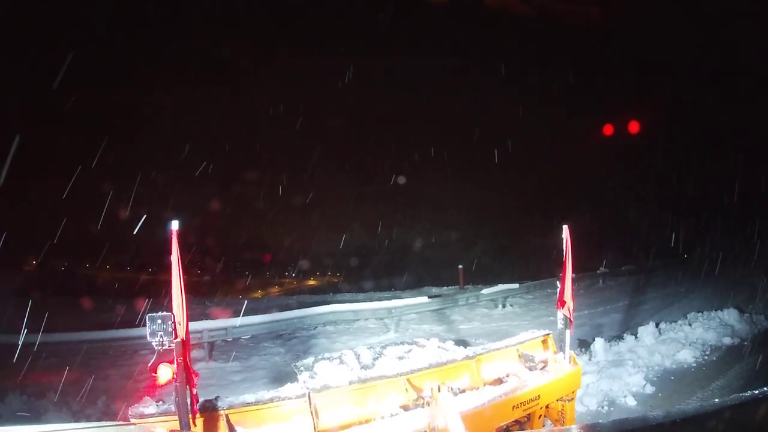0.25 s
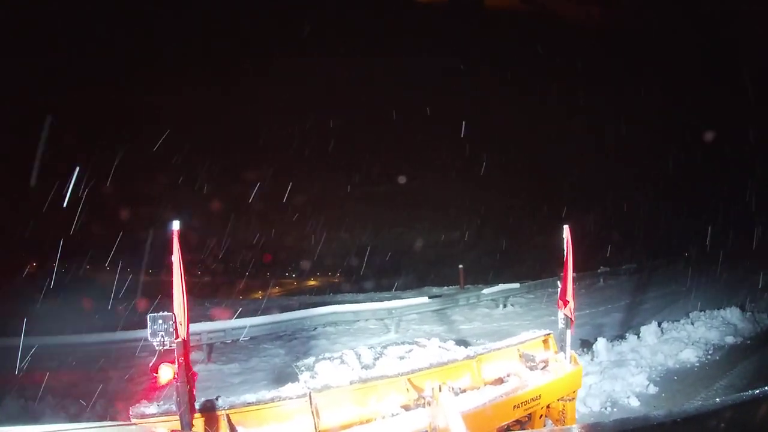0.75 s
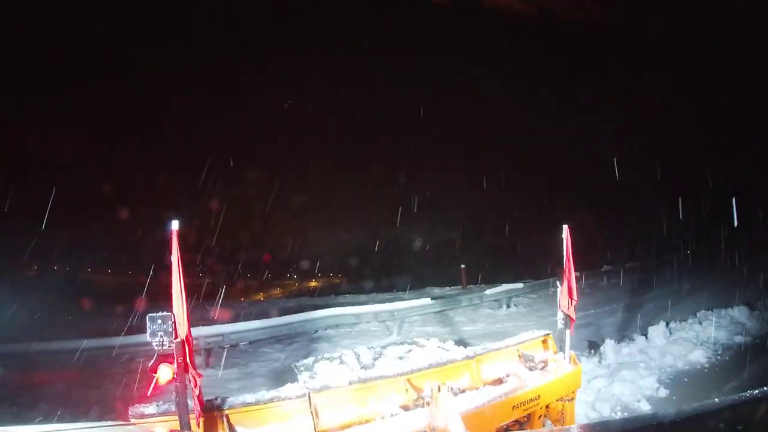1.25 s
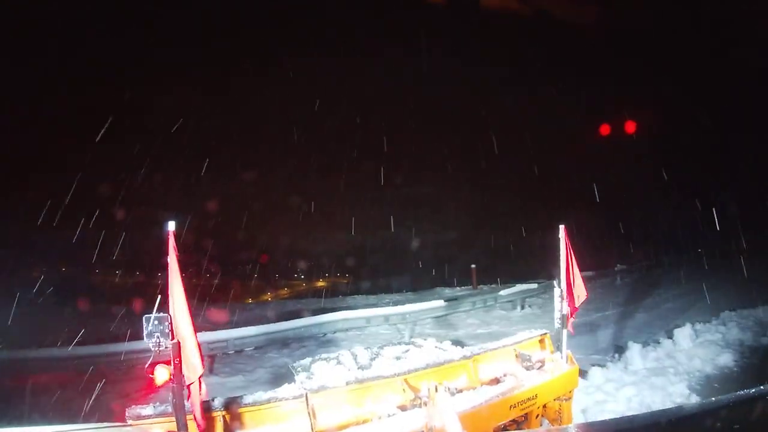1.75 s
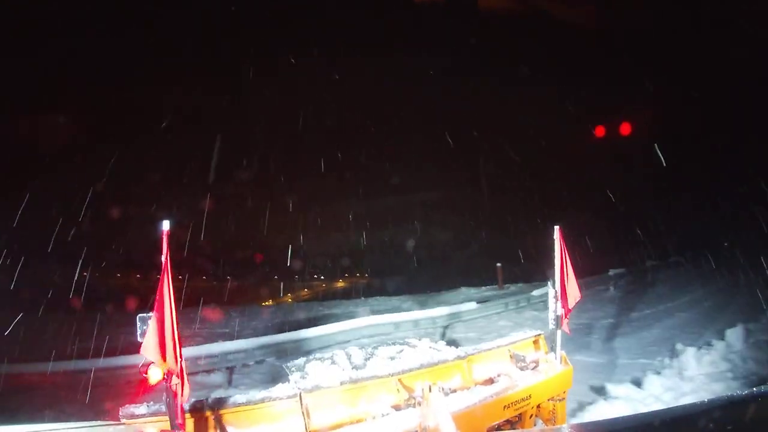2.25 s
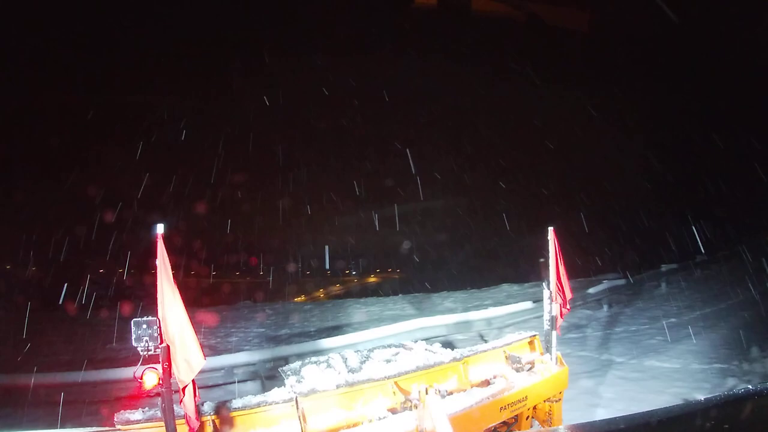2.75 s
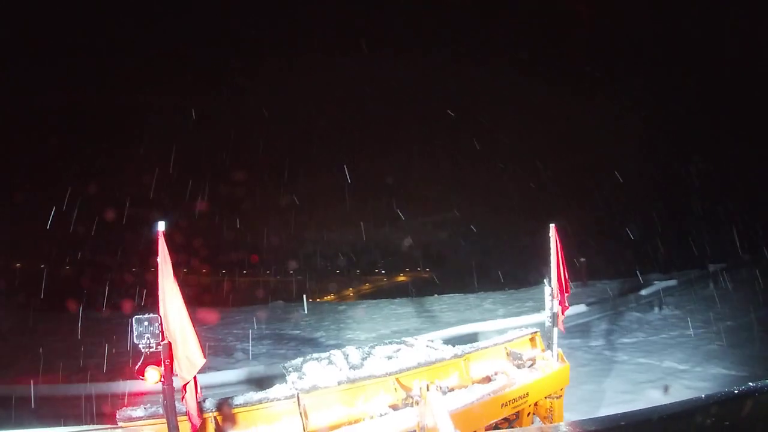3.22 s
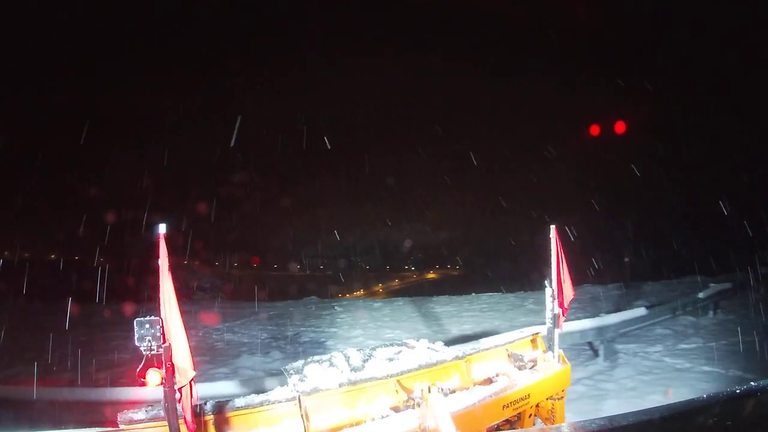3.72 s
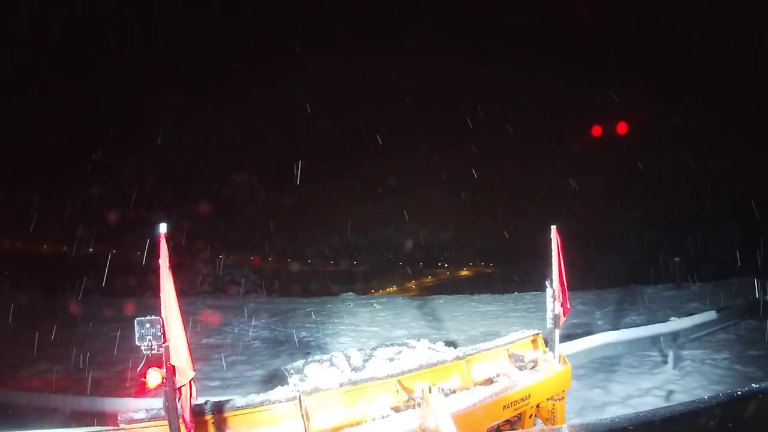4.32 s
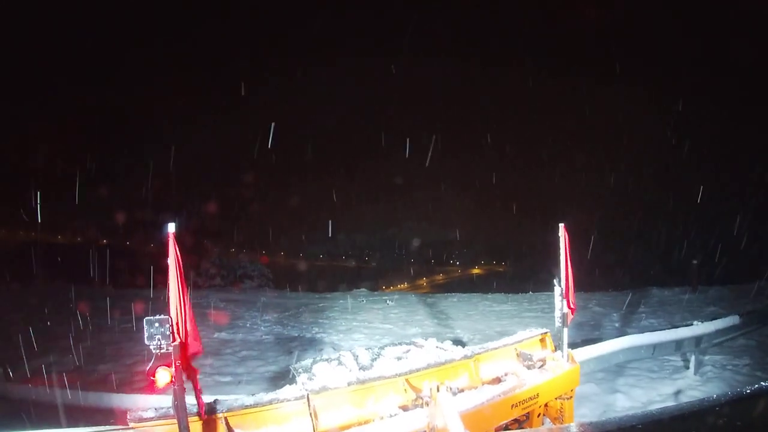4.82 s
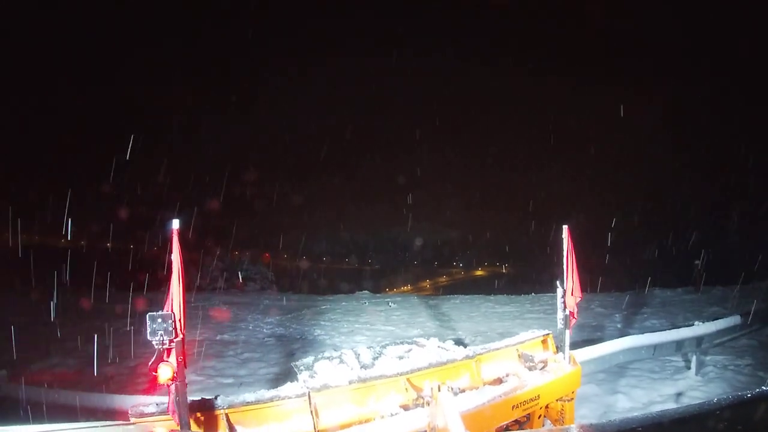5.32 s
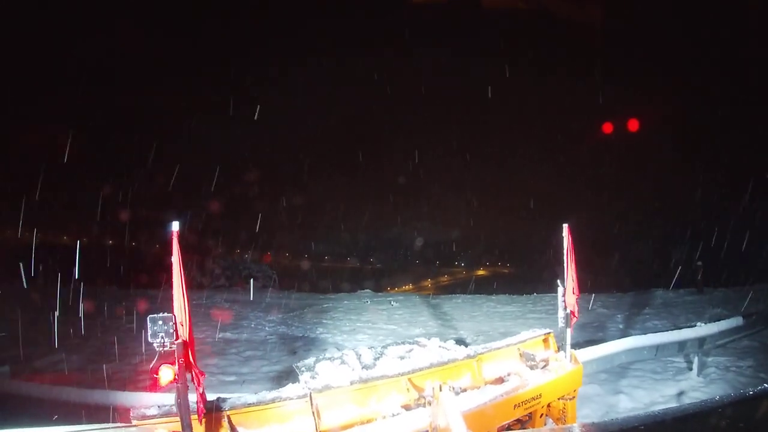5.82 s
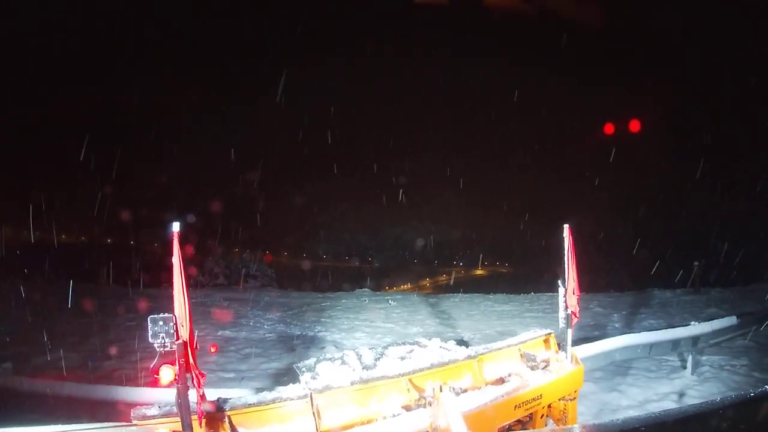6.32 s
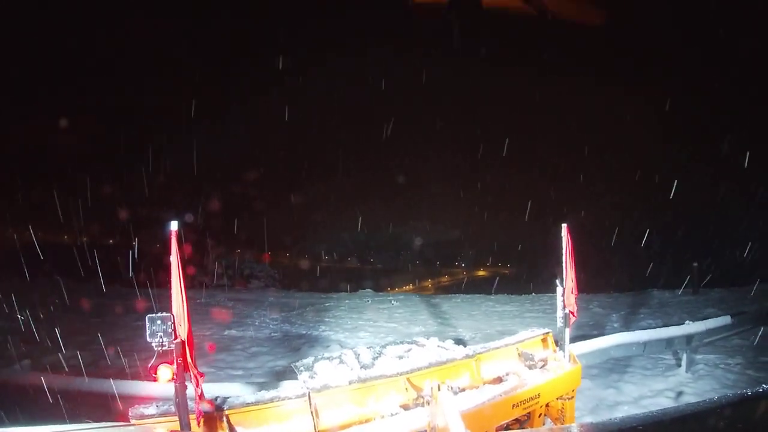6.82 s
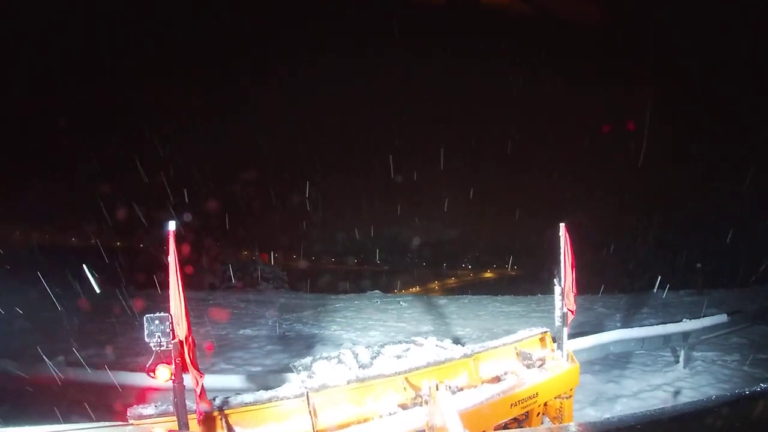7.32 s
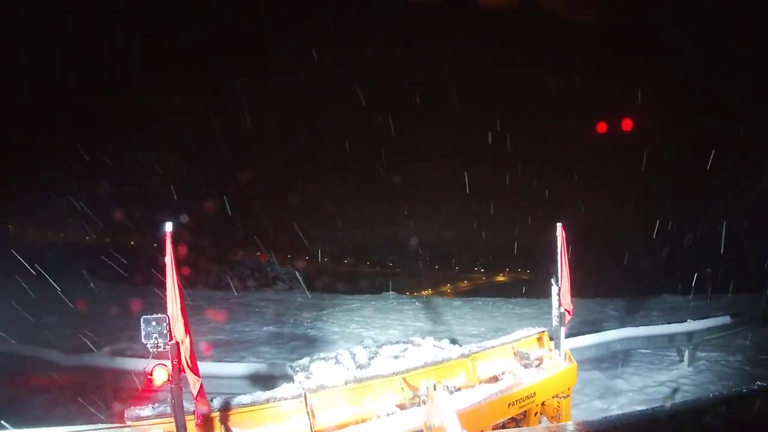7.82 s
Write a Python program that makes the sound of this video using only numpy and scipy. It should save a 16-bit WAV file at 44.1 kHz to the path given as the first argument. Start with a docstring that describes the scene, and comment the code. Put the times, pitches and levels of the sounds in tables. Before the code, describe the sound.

Inside the closed cab of a snow plow truck, a deep diesel boom dominates, wavering and dipping briefly over low tyre rumble, a steady muffled blade scrape and very faint spray hiss. Around 0.4 s the blade drags harder, and from 0.6 to 0.8 s it bangs in a rapid, uneven cluster of metallic knocks with heavy chassis thumps. The edge chatters until about 1.2 s while revs climb quickly, then sink towards 1.9 s. A short squeak sounds at 1.3 s. A dull knock and thump land at 2.1 s as the engine surges again until 2.5 s, then drops. Another muffled knock comes at 3.3 s. Revs ease, jump up near 4.5 s, then slowly decline until about 7 s, rising again at the end. The clearest chirp is at 5.6 s, with smaller squeaks at 6.2 and 7.2 s and light trim ticks and rattles from 7.2 to 7.8 s.

```python
"""The engine of a diesel truck booms at low revs, heard from inside the cab, over tyre rumble.
A snow plow's blade scrapes, spray hisses, and the edge chatters over hard ground.
The plow bangs and the chassis thumps; short high squeaks and ticks of loose trim follow.
Engine and squeaks are phase-driven tones; road, chatter and ticks are coloured noise;
knocks mix a noise clash with ringing modes, and thumps are damped sines."""
import sys
import numpy as np
from scipy import signal
from scipy.fft import rfft, irfft, next_fast_len
from scipy.io import wavfile
from scipy.ndimage import uniform_filter1d, minimum_filter1d

SR = 44100
rng = np.random.default_rng(int(sys.argv[2]) if len(sys.argv) > 2 else 0)


def to_wav(s):
    """Save 16-bit WAV."""
    ch = np.atleast_2d(s).T  # columns
    pcm = np.round(np.clip(ch, -1, 1) * 32767)  # PCM
    wavfile.write(sys.argv[1], SR, pcm.astype(np.int16))


N = 355887
BAND_LIMIT_HZ = 15900


def amp(db):
    """Decibels to linear amplitude."""
    return 10 ** (np.asarray(db) / 20)


def unit(x):
    """Scales a signal to rms 1."""
    return x / np.sqrt(np.mean(x ** 2) + 1e-20)


def curves(rows):
    """Interpolates each column after the time column, sample by sample."""
    time_s, *columns = np.transpose(rows)
    return [np.interp(np.arange(N) / SR, time_s, column) for column in columns]


def resonance(hz, centre_hz, width_hz):
    """Bump of height 1 at the centre, 1/2 at the edges of its width."""
    return 1 / (1 + (2 * (hz - centre_hz) / width_hz) ** 2)


def colour(x, spectrum, peaks=()):
    """Filters by a smooth spectrum plus resonant bumps; rms 1."""
    hz = np.fft.rfftfreq(len(x), 1 / SR)
    point_hz, point_db = np.transpose(spectrum)
    gain_db = np.interp(np.log(hz + 1), np.log(point_hz), point_db)
    for centre_hz, width_hz, boost_db in peaks:
        gain_db = gain_db + boost_db * resonance(hz, centre_hz, width_hz)
    return unit(irfft(rfft(x) * amp(gain_db), len(x)))


def wander(hz, size=N):
    """Smooth random drift: noise with a Gaussian low-pass at hz, rms 1 over the scene."""
    length = next_fast_len(N)
    f = np.fft.rfftfreq(length, 1 / SR)
    spectrum = rfft(rng.standard_normal(length)) * np.exp(-(f / hz) ** 2)
    return unit(irfft(spectrum))[:size]


def arch(start_s, length_s):
    """Rises from 0 to 1 and back over the given stretch."""
    progress = np.clip((np.arange(N) / SR - start_s) / length_s, 0, 1)
    return np.sqrt(abs(np.sin(np.pi * progress)))


def add(mix, start_s, sound):
    """Adds a sound into the mix in place, cut at the end."""
    part = mix[max(round(start_s * SR), 0):][:len(sound)]
    part += sound[:len(part)]


# engine speed, rising with the throttle and sagging after it: time_s, firing_rate_hz
REVS = [(0.0, 38.6), (0.4, 37.6), (0.84, 31.75), (0.97, 41.5), (1.08, 48.5), (1.19, 50.35), (1.78, 30.43),
        (1.95, 27.44), (2.04, 29.18), (2.29, 44.07), (2.51, 47.97), (2.68, 33.46), (2.83, 33.15),
        (3.14, 36.64), (3.8, 32.62), (4.25, 30.53), (4.56, 44.65), (4.99, 44.6), (5.3, 41.3), (7.1, 33.66),
        (7.6, 33.69), (8.07, 42.97)]


def firing_angle():
    """Phase of the engine: one turn for each firing."""
    return 2 * np.pi * np.cumsum(curves(REVS)[0]) / SR


# boom at the firing rate: time_s, level_db
BOOM = [(0, -14.5), (.8, -13), (.95, -12.5), (1.2, -11.5), (1.5, -16), (1.92, -12), (2.45, -12.5),
        (2.8, -15.5), (3.6, -13), (4.5, -14), (5, -18), (5.6, -13.5), (6.4, -15.5), (7, -14), (8.07, -12.5)]
# brief dips of the boom: middle_s, half_length_s, depth_db
BOOM_DIPS = [(0.624, 0.11, 6.5), (1.281, 0.076, 7), (1.77, 0.068, 10), (2.128, 0.02, 8), (2.646, 0.1, 10),
             (3.35, 0.083, 8), (3.865, 0.19, 2.5), (4.699, 0.024, 10), (4.785, .025, 5), (4.97, 0.036, 6),
             (5.135, 0.028, 7), (5.23, 0.026, 11), (6.57, 0.04, 3.5), (6.739, .035, 3)]
# main overtones before cab lift: time_s, order_2_db, order_3_db, order_4_db, order_10_3_db
OVERTONES = [(0, -30, -36, -51, -41.5), (.35, -27.5, -39, -45.5, -41), (.7, -33, -47, -37, -45),
             (1.05, -36.5, -40, -50, -47), (1.6, -34, -46, -45.5, -41), (1.9, -29.5, -44.5, -46, -47.5),
             (2.55, -36.5, -47, -53, -54), (2.9, -32.5, -45, -42.5, -43.5), (4.1, -33.5, -35.5, -34.5, -43),
             (4.45, -35.5, -39.5, -45.5, -45.5), (4.8, -29, -38.5, -46.5, -52),
             (5.2, -32, -43.5, -48, -38.5), (5.7, -31, -43, -52, -41), (6.05, -35.5, -44, -47.5, -36.5),
             (6.65, -28, -46, -34, -42.5), (7.1, -37, -45, -40.5, -45), (7.4, -44, -46, -34.5, -46),
             (7.8, -32, -40.5, -46.5, -40.5), (8.07, -38, -42.5, -48, -44)]
# weaker engine orders before cab lift: multiple_of_firing_rate, level_db
WEAK_ORDERS = [(4 / 3, -43.5), (8 / 3, -42), (5, -46), (6.5, -51), (9, -53.5), (16 / 3, -49.5)]
# cab air resonances: centre_hz, width_hz, boost_db
CAB_AIR = [(63, 13, 10.5), (128.9, 23.2, 8), (170.4, 11, 7.5)]
BOOM_WAVER_DB, WAVER_DB_PER_DIP_DB = 1.25, 0.37


def engine(angle):
    """Firing-rate boom in the closed cab; overtones swell in its resonances, roughened by uneven combustion."""
    rate_hz, t = curves(REVS)[0], np.arange(N) / SR
    dip_db = sum(depth_db * np.exp(-((t - middle_s) / half_s) ** 4)
                 for middle_s, half_s, depth_db in BOOM_DIPS)
    waver_db = (BOOM_WAVER_DB + WAVER_DB_PER_DIP_DB * dip_db) * wander(hz=22.2)
    out = amp(curves(BOOM)[0] - dip_db + waver_db) * np.cos(angle)
    muffle_db = -.3 * np.maximum(rate_hz - 44, 0)  # high revs soften the overtones
    main_orders = list(zip([2, 3, 4, 10 / 3], curves(OVERTONES)))
    for multiple, level_db in main_orders + list(WEAK_ORDERS):
        lift_db = sum(boost_db * resonance(multiple * rate_hz, centre_hz, width_hz)
                      for centre_hz, width_hz, boost_db in CAB_AIR)
        if multiple % 1:
            offset_rad = 2 * np.pi * rng.random()
        else:
            offset_rad = np.pi / 2 * (multiple - 1)  # whole orders lock into one steep stroke
        phase = multiple * angle + offset_rad + 0.27 * wander(hz=16.0)
        order_db = level_db + lift_db + muffle_db + 1.5 * wander(hz=7.1)
        out += amp(order_db) * np.cos(phase)
    return np.sqrt(2) * out  # peak to rms levels


# driving levels: time_s, rumble_db, scrape_db, hiss_db
DRIVE = [(0, -28, -37.5, -54), (.36, -28.5, -38, -60), (.72, -24, -38.5, -62.5), (.95, -26.5, -38, -54.5),
         (1.15, -25.5, -38.5, -57), (1.21, -31.5, -43, -65.5), (1.95, -27, -39.5, -56.5),
         (2.42, -30.5, -40.5, -62.5), (2.54, -31.5, -43, -61.5), (3.4, -27, -38, -62),
         (4.8, -27.5, -38.5, -59.5), (5.6, -26.5, -36, -56), (6.1, -28, -37.5, -59.5),
         (7.45, -26, -37.5, -58.5), (8.07, -31.5, -40, -61.5)]
# blade drags over hard patches: start_s, length_s, scrape_boost_db, hiss_boost_db
DRAGS = [(0.426, 0.16, 2.5, 11), (3.47, 0.066, 1.5, 6)]
# tyre and chassis rumble spectrum: freq_hz, relative_density_db
RUMBLE_COLOUR = [(12, -8), (26, 5), (55, -3), (90, 2.5), (128, 0.5), (155, -3), (185, -3), (222, -7.5),
                 (295, -5), (380, -12), (480, -16.5), (700, -22), (1500, -75.5)]
# cab boom excited by the tyres: centre_hz, width_hz, boost_db
RUMBLE_PEAKS = [(127.5, 11, 4.5), (245, 10, 1.5), (287, 16, 2)]
# blade scrape spectrum: freq_hz, relative_density_db
SCRAPE_COLOUR = [(150, -25.5), (400, -2), (570, 5), (700, -3.5), (900, -1), (1100, -4.5), (1500, -6),
                 (1900, -8), (2300, -13), (3150, -13), (3800, -19.5), (5000, -28), (6500, -42), (9000, -72)]
# cab panel resonances excited by the scrape: centre_hz, width_hz, boost_db
PANELS = [(555, 92, 4), (786, 45, 4), (1231, 42, 7.5), (3100, 350, 1.5)]
# snow spray spectrum: freq_hz, relative_density_db
HISS_COLOUR = [(1500, -34.5), (3500, 2), (4700, 1), (5200, 1.5), (5650, 3), (6100, -5), (6600, -13.5),
               (7800, -16), (8700, -22.5), (10500, -21), (11500, -52.5), (16000, -77.5)]
CLATTER_DEPTH = 0.067


def road(angle):
    """Tyres shake the chassis, the blade grinds over packed snow, and spray hisses on the cab."""
    rumble_db, scrape_db, hiss_db = curves(DRIVE)
    for start_s, length_s, scrape_boost_db, hiss_boost_db in DRAGS:
        drag = arch(start_s, length_s)
        scrape_db = scrape_db + scrape_boost_db * drag
        hiss_db = hiss_db + hiss_boost_db * drag
    tyres, blade, spray = rng.standard_normal((3, N))
    clatter = 1 + CLATTER_DEPTH * np.cos(angle)  # diesel clatter swells at every firing
    rumble = colour(tyres, RUMBLE_COLOUR, RUMBLE_PEAKS) * amp(rumble_db + 1.1 * wander(hz=16.0))
    scrape = colour(blade * clatter, SCRAPE_COLOUR, PANELS) * amp(scrape_db + .5 * wander(hz=27))
    hiss = colour(spray * clatter, HISS_COLOUR) * amp(hiss_db + 0.73 * wander(hz=20))
    return rumble + scrape + hiss


def cab(x):
    """Glass and trim return a dense, very short echo."""
    t = np.arange(4096) / SR
    echo = rng.standard_normal(len(t)) * amp(-60 * t / 0.07) * (t > .002)
    echo /= np.linalg.norm(echo)
    return x + amp(-9.0) * signal.oaconvolve(x, echo)[:N]


# edge chatter over hard ground, before cab echo: start_s, length_s, level_db
CHATTERS = [(0.492, .08, -48), (.8, 0.42, -47)]
# slip grain spectrum: freq_hz, relative_density_db
EDGE_COLOUR = [(300, -21), (900, 5), (1800, -6), (3000, -20), (6000, -30), (10000, -59)]
# ring of the steel edge: centre_hz, width_hz, boost_db
EDGE_RINGS = [(1220, 81, 11), (2350, 140, 16)]
MEAN_SLIPS_PER_S = 570


def chatter():
    """The steel edge catches and slips on hard ground: uneven grains that ring the blade."""
    grip = sum(amp(level_db) * arch(start_s, length_s) for start_s, length_s, level_db in CHATTERS)
    slips = (rng.random(N) < MEAN_SLIPS_PER_S / SR) * rng.standard_normal(N)
    return cab(colour(slips, EDGE_COLOUR, EDGE_RINGS) * grip)


# plow knocks: start_s, level_db, clash_t60_s, treble_db
KNOCKS = [(.597, -17, 0.13, 1), (0.610, -21.5, 0.12, 1.5), (0.628, -26.5, .08, -5),
          (.642, -18.5, 0.079, -0.5), (0.653, -25.5, 0.12, 4), (.683, -27, .1, -6), (0.717, -27, .08, -9),
          (0.749, -29, .08, -6), (0.786, -36, 0.14, 2), (.818, -36, .1, 3.5), (2.112, -19, 0.22, -20.5),
          (3.29, -23, 0.22, -24)]
# linkage clash spectrum: freq_hz, relative_density_db
KNOCK_COLOUR = [(50, -15), (120, 7), (200, -3.5), (330, -2), (480, -3.5), (680, -5.5), (1000, -14.5),
                (2000, -24.5), (3500, -27), (4600, -30), (5700, -29.5), (6800, -40.5), (10000, -54),
                (15000, -74)]
# plow frame modes: pitch_hz, relative_level_db, t60_s
FRAME = [(126, 0.5, 0.23), (178, 3.5, 0.16), (268, -1, .15), (373, 4.5, 0.14), (438, 3.5, 0.11),
         (565, 8.5, 0.08), (672, 2, 0.059)]
RING_PEAK_DB, CLASH_DB = 8, -1.5  # relative to each knock
RING_SPREAD_DB, RING_DETUNE_RATIO = 2.5, 0.029  # standard deviations from blow to blow


def knocks():
    """The blade trips and drops back: a linkage clash and a short frame ring, different at every blow."""
    out, t = np.zeros(N), np.arange(SR // 2) / SR
    low_pass = signal.butter(2, 260, fs=SR, output="sos")
    for start_s, level_db, clash_t60_s, treble_db in KNOCKS:
        clash = colour(rng.standard_normal(len(t)), KNOCK_COLOUR) * amp(-60 * t / clash_t60_s)
        ring = np.zeros(len(t))
        for pitch_hz, mode_db, t60_s in FRAME:
            blow_db = mode_db + RING_SPREAD_DB * rng.standard_normal()
            blow_hz = pitch_hz * (1 + RING_DETUNE_RATIO * rng.standard_normal())
            ring += amp(blow_db - 60 * t / t60_s) * np.sin(2 * np.pi * blow_hz * t)
        blow = amp(CLASH_DB) * clash + amp(RING_PEAK_DB) * ring / abs(ring).max()
        thud = signal.sosfilt(low_pass, blow)
        onset = 1 - np.exp(-t / 0.00059)
        add(out, start_s, amp(level_db) * onset * (thud + amp(treble_db) * (blow - thud)))
    return out


# chassis thumps as the blade lands: start_s, pitch_hz, level_db
THUMPS = [(.604, 125, -11), (0.679, 107, -18), (0.715, 116, -10), (0.747, 125, -20), (2.125, 85, -18)]
THUMP_RISE_S = 0.004


def thumps():
    """A few heavy swings of the chassis, quickly damped."""
    out, t = np.zeros(N), np.arange(SR // 5) / SR
    swing = t / THUMP_RISE_S * np.exp(1 - t / THUMP_RISE_S)
    for start_s, pitch_hz, level_db in THUMPS:
        add(out, start_s, amp(level_db) * swing * np.sin(2 * np.pi * pitch_hz * t))
    return out


# squeaks before cab echo:
# start_s, length_s, start_hz, middle_hz, end_hz, level_db, octave_db (relative), flutter (0-1)
SQUEAKS = [(0.936, 0.094, 10300, 10500, 10450, -59, -40, 0.3), (1.04, .04, 2480, 2350, 2250, -50, -36, 0.6),
           (1.091, 0.09, 2430, 2389, 2350, -53, -33, 0.63),
           (1.327, 0.092, 5054, 5006, 4950, -38.5, -34, .04), (1.402, .02, 4990, 4990, 4960, -56, -30, .1),
           (1.422, 0.039, 4910, 4890, 4900, -56, -30, .15),
           (4.518, 0.04, 4377, 4290, 4240, -54.5, -19, 0.4), (4.574, 0.023, 4100, 3980, 3900, -50, -29, .9),
           (5.044, 0.081, 15900, 15550, 15710, -57, -40, .5), (5.1, .07, 15700, 15700, 15720, -74, -40, .3),
           (5.613, 0.032, 4305, 4280, 4304, -38.5, -31, 0.4),
           (5.627, 0.054, 4213, 4460, 4540, -31, -24, .25), (5.68, 0.071, 9200, 9230, 9220, -54, -40, 0.7),
           (6.199, 0.017, 4670, 4450, 4430, -43.5, -18, 0.14),
           (6.209, 0.025, 4400, 4500, 4520, -48, -22, 0.2), (7.21, 0.024, 4800, 4577, 4317, -38, -24, 0.33),
           (7.234, .022, 4400, 4490, 4580, -48, -24, 0.3), (.945, .065, 13800, 13570, 13500, -72, -40, .4),
           (2.005, .03, 14350, 14100, 14280, -72, -40, .3)]


def squeaks():
    """Stick-slip squeals: a gliding tone with weak overtones that flutters as the grip changes."""
    out = np.zeros(N)
    for start_s, length_s, start_hz, middle_hz, end_hz, level_db, octave_db, flutter in SQUEAKS:
        progress = np.linspace(0, 1, int(length_s * SR))
        grip = wander(hz=170, size=len(progress))
        glide_hz = np.interp(progress, [0, .5, 1], [start_hz, middle_hz, end_hz])
        angle = 2 * np.pi * np.cumsum(glide_hz + 120 * flutter * grip) / SR
        swell = np.sin(np.pi * progress ** 0.64) ** 2 * abs(1 + flutter * grip)
        harmonics_db = enumerate([0, octave_db, octave_db - 18], 1)
        tone = sum(amp(harmonic_db) * np.sin(k * angle)
                   for k, harmonic_db in harmonics_db if k * end_hz < BAND_LIMIT_HZ)
        add(out, start_s, amp(level_db) * unit(swell * tone))
    return cab(out)


# single taps of the trim: start_s, level_db
TICKS = [(.945, -49), (1.177, -55), (1.466, -49), (2.41, -50), (3.495, -56), (3.52, -52), (7.337, -46),
         (7.367, -61), (7.485, -47.5), (7.603, -50), (7.80, -57)]
# trim rattles, one tap per firing: start_s, length_s, mean_level_db
RATTLES = [(2.332, .13, -54.5), (7.21, .1, -51), (7.561, .05, -48)]
# tap spectrum: freq_hz, relative_density_db
TICK_COLOUR = [(800, -22), (3000, 2), (5500, 3), (6800, -9), (8500, -12.5), (10300, -9), (12000, -19.5),
               (15000, -58)]
TICK_T60_S = 0.071


def ticks(angle):
    """Loose trim taps: short, bright bursts, alone or shaken out by the firings."""
    out, t = np.zeros(N), np.arange(2048) / SR
    firings_s = np.flatnonzero(np.diff(angle // (2 * np.pi))) / SR
    shaken = [(firing_s, level_db + 2.0 * rng.standard_normal())
              for start_s, length_s, level_db in RATTLES
              for firing_s in firings_s if start_s <= firing_s < start_s + length_s]
    for start_s, level_db in list(TICKS) + shaken:
        burst = colour(rng.standard_normal(len(t)), TICK_COLOUR)
        add(out, start_s, amp(level_db - 60 * t / TICK_T60_S) * burst)
    return out


def scene():
    """Sums all sources into one channel."""
    angle = firing_angle()
    plow = chatter() + knocks() + thumps()
    trim = squeaks() + ticks(angle)
    return (engine(angle) + road(angle) + plow + trim)[None]


LIMIT_DB, LIMIT_WINDOW_SAMPLES, FADE_S = -6.2, 1323, .003


def record(dry):
    """A fast limiter holds the crests; short fades at both ends, then the band limit."""
    crest = -minimum_filter1d(-abs(dry), size=LIMIT_WINDOW_SAMPLES)  # running maximum
    gain = np.minimum(amp(LIMIT_DB) / (crest + 1e-9), 1)
    gain = uniform_filter1d(gain, size=LIMIT_WINDOW_SAMPLES)
    samples_to_end = np.minimum(np.arange(N), np.arange(N)[::-1])
    fade = np.minimum(samples_to_end / (FADE_S * SR), 1)
    low_pass = signal.firwin(511, BAND_LIMIT_HZ, window=("kaiser", 9), fs=SR)
    return signal.oaconvolve(dry * gain * fade, low_pass[None], "same")


dry = scene()
out = record(dry)
to_wav(out)
```